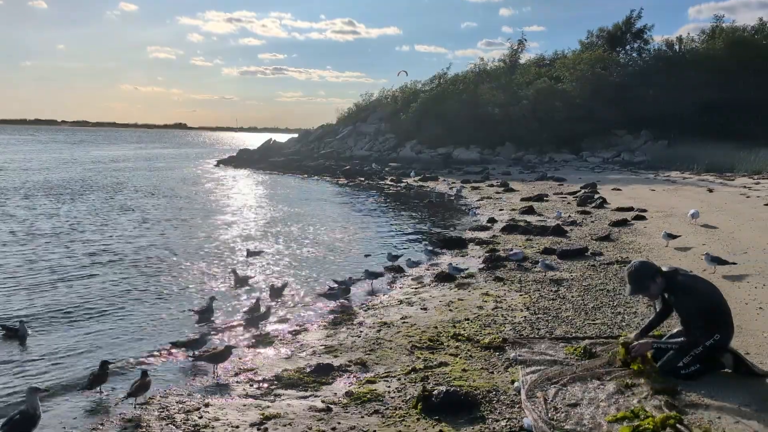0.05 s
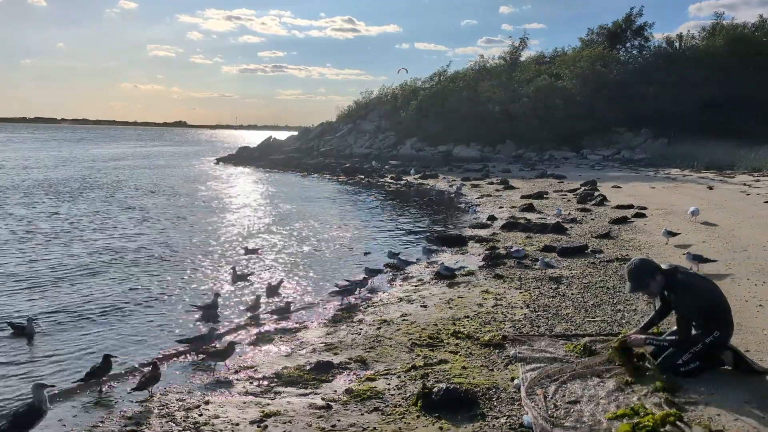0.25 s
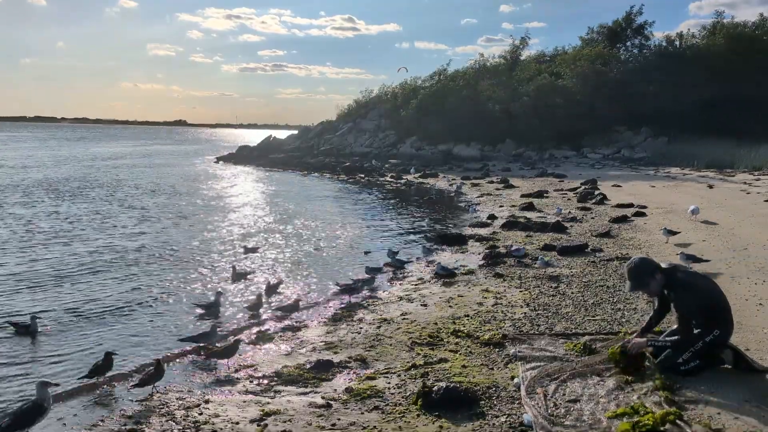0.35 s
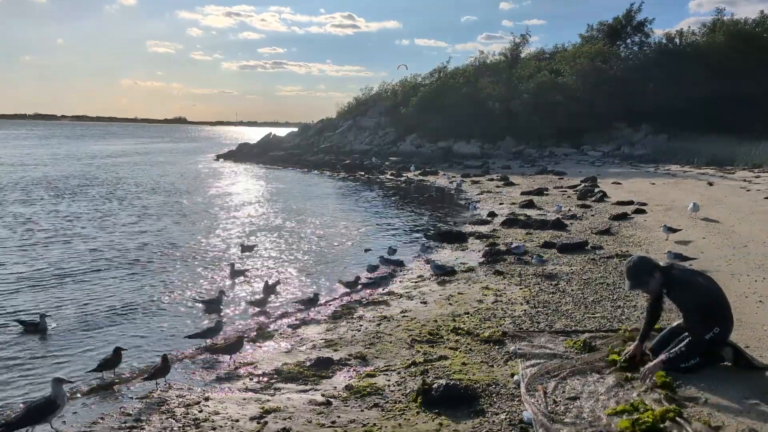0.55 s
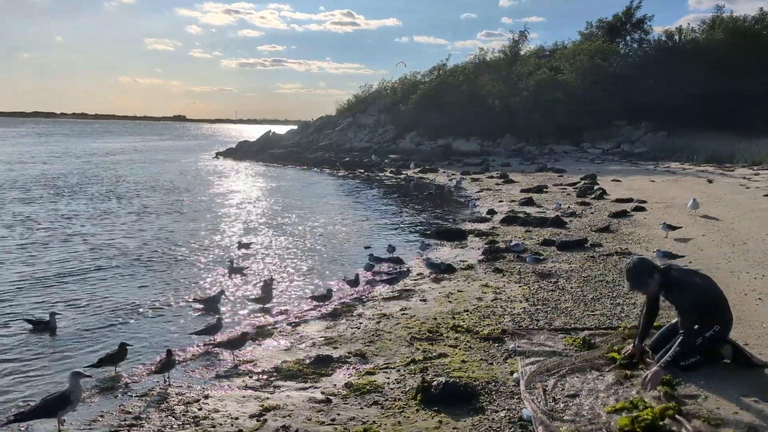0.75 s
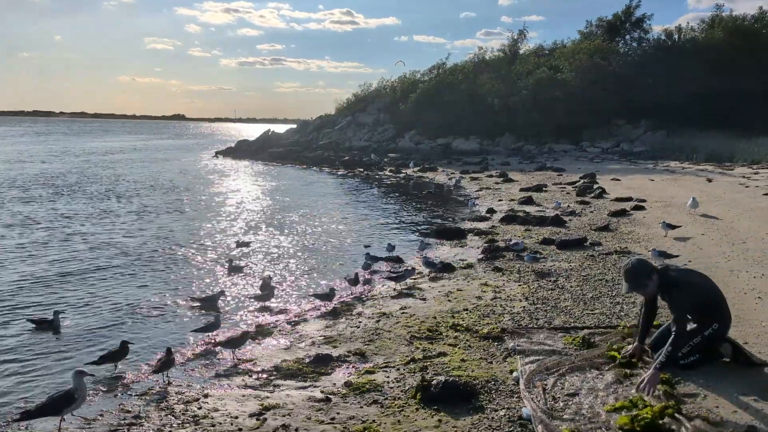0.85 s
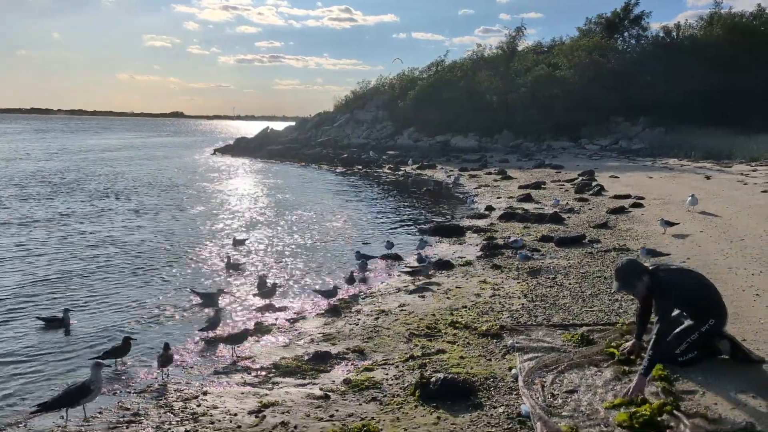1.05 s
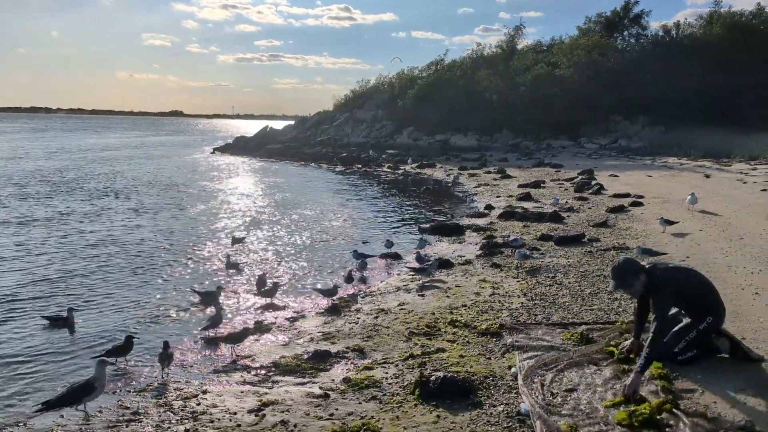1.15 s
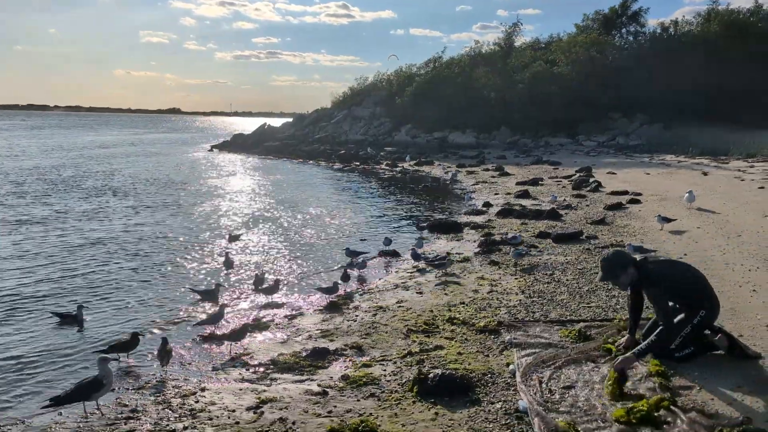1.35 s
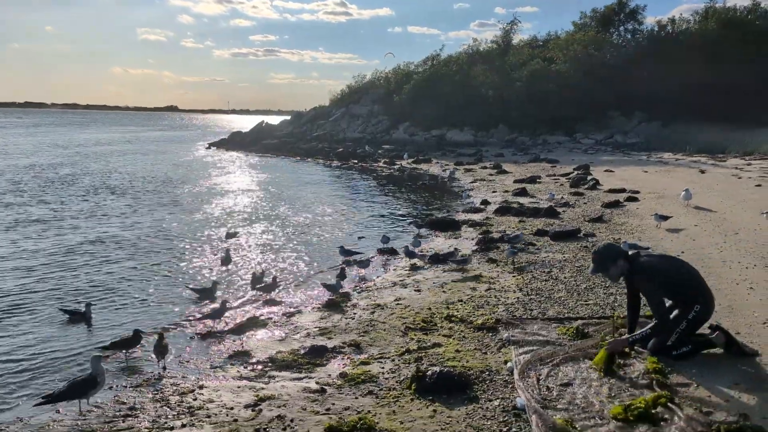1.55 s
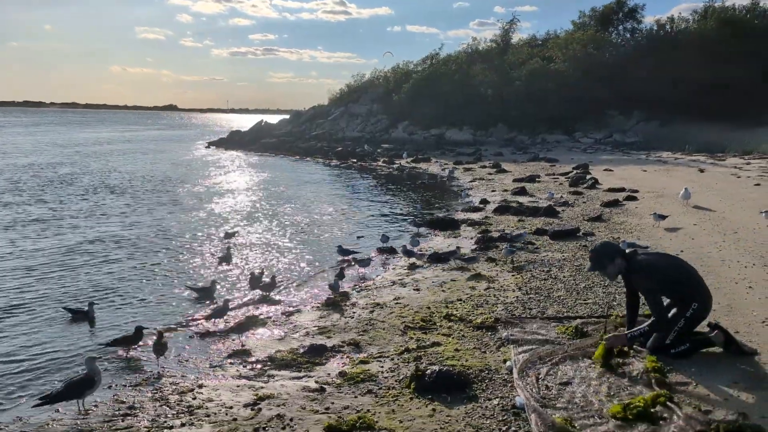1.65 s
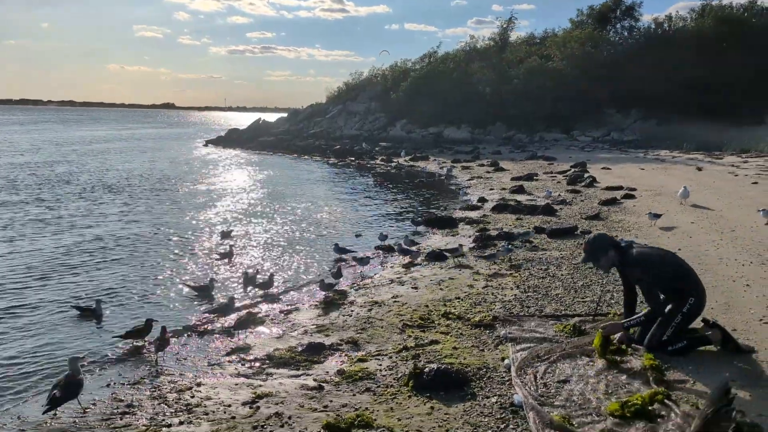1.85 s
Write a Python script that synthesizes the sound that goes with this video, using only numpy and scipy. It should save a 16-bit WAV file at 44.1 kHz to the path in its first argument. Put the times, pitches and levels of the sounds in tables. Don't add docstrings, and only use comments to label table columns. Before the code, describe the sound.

Gulls give high, clear whistling cries and quick yodels on the right over distant water wash

```python
import sys
import numpy as np
from scipy import signal
from scipy.fft import rfft, irfft
from scipy.io import wavfile
from scipy.ndimage import uniform_filter1d

SR = 44100
rng = np.random.default_rng(int(sys.argv[2]) if len(sys.argv) > 2 else 0)


def log_audio(samples):
    frames = np.atleast_2d(samples).T
    limited = np.clip(frames, -1, 1)
    pcm = np.round(limited * 32767).astype(np.int16)
    wavfile.write(sys.argv[1], SR, pcm)


def convert_level_to_amplitude(level_db):
    exponent = np.asarray(level_db, float) / 20
    return 10 ** exponent


N = 83790
T = np.arange(N) / SR
HZ = np.maximum(np.arange(N // 2 + 1) * SR / N, 1)

# (f/Hz, level/dB per Hz)
WASH_LEFT = [(380, -100), (600, -78), (800, -79.5), (1080, -67), (1400, -82.5), (1800, -101.5),
             (2200, -116), (15000, -134)]
WASH_RIGHT = [(400, -99), (570, -83), (1000, -85.5), (1700, -85), (2000, -101.5), (2700, -106),
              (6000, -114), (15000, -118)]
# (t/s, level/dB)
SWELL = [(0, -51.5), (.3, -47.5), (.7, -51), (1.1, -48.5), (1.3, -45.5), (1.5, -46.5), (1.9, -49.5)]
# (t/s, level/dB)
FIZZ = [(0, -4), (.2, -3.5), (.4, -7), (1.6, -8.5), (1.78, -1.5)]
# (f/Hz, level/dB per Hz)
WIND = [(25, -110), (45, -92), (75, -68.5), (120, -71.5), (180, -75.5), (250, -90), (340, -99), (600, -125)]
# (t/s, level/dB, left minus right/dB)
GUSTS = [(0, -52.5, -1.5), (0.501, -53, -0.5), (0.572, -38.5, 6.5), (.63, -55.5, 0.5), (0.721, -45, 0),
         (.8, -52, 5), (.9, -53, -3), (1.171, -51.5, 1), (1.26, -44, -5), (1.33, -53, -1), (1.9, -56, -3.5)]
# (t/s, peak level/dB, left minus right/dB)
TICKS = [
    (0.0886, -60, -8.5),
    (0.153, -63, -13.5),
    (1.0794, -48.5, -29),
    (1.2405, -59, -26),
    (1.4029, -60.5, -18.5),
    (1.638, -60, -11),
    (1.6666, -63, -15),
]
# (f/Hz, level re right/dB)
SHADE = [(500, 1.5), (1100, 22.5), (2200, -17), (3500, -25), (4400, -44), (7000, -52.5), (9000, -58)]

# (t/s, f/Hz, level/dB)
LONG_CRY = [(.234, 4340, -52), (.247, 4356, -29.5), (.281, 4210, -51.5), (.315, 4447, -36.5),
            (.35, 4575, -41.5), (.467, 4390, -37.5), (.53, 4260, -39.5), (.659, 4038, -38.5),
            (.686, 3790, -49.5)]
LOW_OPEN = [(.43, 3500, -36.5), (.445, 3480, -30), (.466, 3295, -32), (.505, 3470, -31),
            (.552, 3520, -27.5), (.566, 3624, -46.5)]
HIGH_HOLD = [(.555, 4684, -35.5), (.59, 4727, -38.5), (.602, 4560, -34), (.645, 4656, -40),
             (.657, 4515, -39.5), (.685, 4400, -47)]
DIP_CRY = [(.845, 4030, -39.5), (.865, 4150, -33), (.899, 3940, -33), (.93, 3777, -37), (.981, 3900, -36),
           (1.013, 4085, -38.5), (1.024, 4270, -61)]
FAR_ARCH = [(.865, 4890, -59), (.93, 5160, -59.5), (.99, 5204, -62.5), (1.06, 5120, -65), (1.13, 5040, -76)]
LAST_CRY = [(1.48, 3930, -81), (1.51, 3850, -58.5), (1.6, 3990, -38.5), (1.64, 3940, -46.5),
            (1.672, 3920, -75), (1.7, 4180, -88.5)]
FADING_CRY = [(0, 4900, -64), (.012, 4070, -69), (.05, 3750, -75), (.115, 3620, -83)]
# (t/s, f/Hz, level/dB)
DIP_LEAPS = [
    [(1.02, 4680, -60.5), (1.14, 4703, -63.5), (1.19, 4520, -60.5), (1.25, 4460, -62), (1.27, 4600, -93)],
]
# (start t/s, length/s, first f/Hz, last f/Hz,
# level/dB)
LOW_FLIPS = [
    (.678, 0.038, 3329, 3410, -34.5),
    (.746, .03, 3180, 3112, -41),
    (.818, .02, 3210, 3020, -40.5),
    (1.341, 0.024, 3160, 3084, -42),
]
HIGH_FLIPS = [
    (.716, 0.031, 4560, 4190, -41.5),
    (.764, 0.026, 4260, 4520, -47),
    (.786, .034, 4370, 4166, -51.5),
]
HOARSE_FLIPS = [
    (.834, .038, 3090, 3130, -50),
    (.76, .018, 3140, 3170, -55),
]
# (count = whistle cycles per undertone cycle, 2nd and 3rd harmonic/dB, roughness/dB,
# undertones/dB, undertone span t/s)
LONG_VOICE = dict(count=2, h2_db=-18, h3_db=-38.5, rough_db=-37.5, sub_db=-10.5, span=(0.37, 0.47))
LOW_VOICE = dict(count=3, h2_db=-29.5, h3_db=-39.5, rough_db=-45.5, sub_db=-30.5)
HIGH_VOICE = dict(count=4, h2_db=-19, h3_db=-29, rough_db=-25, sub_db=-22)
FLIP_VOICE = dict(count=3, h2_db=-11.5, h3_db=-25.5, rough_db=-50.5, sub_db=-26.5)
DIP_VOICE = dict(count=2, h2_db=-26, h3_db=-52.5, rough_db=-34.5)
LEAP_VOICE = dict(count=2, h2_db=-27.5, h3_db=-22.5, rough_db=-17.5, sub_db=-5, span=(0.92, 1))
HOARSE_VOICE = dict(count=3, h2_db=-8.5, h3_db=-19, rough_db=-12, sub_db=1.5)
LAST_VOICE = dict(count=2, h2_db=-19, h3_db=-62, rough_db=-42)
FADING_VOICE = dict(count=2, h2_db=-18, h3_db=-36, rough_db=-9, sub_db=-5.5)
# (f/Hz, level/dB)
THROAT = [(1100, -29), (2200, -7), (3500, 8.5), (5500, -6.5), (6800, -9.5), (9000, -21), (15000, -31.5)]
# (start t/s, length/s, level/dB, pulse rate f/Hz, brightness/dB)
RASPS = [
    (0.211, 0.025, -39.5, 680, -12.5),
    (0.391, 0.043, -33.5, 480, -29.5),
    (0.827, 0.022, -46.5, 600, -23),
    (1.314, 0.024, -41, 750, -6.5),
]
# (f/Hz, width/Hz, level/dB)
RASP_THROAT = [(3153, 400, 4.5), (3917, 890, 7), (5620, 930, -8), (2210, 380, -14.5)]
RASP_BEAK = [(7790, 1850, 4.5), (10200, 980, -26.5), (13000, 8900, -12)]


def shape(table, hz):
    f, db = np.array(table, float).T
    return np.interp(np.log(hz), np.log(f), db)


def envelope(table, column=1):
    points = np.array(table).T
    return np.interp(T, points[0], points[column])


def colour(x, db):
    return irfft(rfft(x) * convert_level_to_amplitude(db), N)


def walk(rate, n=N):
    hold = int(SR / rate)
    steps = np.repeat(rng.standard_normal(n // hold + 1), hold)
    return 1.7 * uniform_filter1d(uniform_filter1d(steps, hold), hold)[:n]


def decay(n, t60_s):
    return np.exp(-np.log(1000) * np.arange(n) / SR / t60_s)


def noise_pair(left, right, likeness, flicker_db, rate, bands, fizz_db=0):
    shared, *own = rng.standard_normal((3, N))
    noise = np.sqrt(likeness) * shared + np.sqrt(1 - likeness) * np.array(own)
    spectrum = rfft(noise) * convert_level_to_amplitude([shape(left, HZ), shape(right, HZ)]) * np.sqrt(SR / 2)
    half_octave = 2 * np.log2(HZ / 20)
    out = np.zeros((2, N))
    for k in bands:
        band = irfft(spectrum * np.clip(1 - abs(half_octave - k), 0, 1), N)
        lift_db = fizz_db if k > 14 else 0
        out += band * convert_level_to_amplitude(flicker_db * walk(rate) + lift_db)
    return out


def distant_wash():
    wash = noise_pair(WASH_LEFT, WASH_RIGHT, likeness=0.11, flicker_db=2.0, rate=12.29,
                      bands=range(7, 20), fizz_db=envelope(FIZZ))
    return wash * convert_level_to_amplitude(envelope(SWELL) + 50)


def wind():
    rumble = noise_pair(WIND, WIND, likeness=0.3, flicker_db=1.8, rate=10.76, bands=range(11))
    gust_db = envelope(GUSTS) + 53.5
    pan_db = envelope(GUSTS, 2) / 2
    return rumble * convert_level_to_amplitude([gust_db + pan_db, gust_db - pan_db])


def ticks():
    out = np.zeros((2, N))
    n = 600
    for start, db, pan_db in TICKS:
        i = int(start * SR)
        click = rng.standard_normal(n) * decay(n, t60_s=0.012)
        out[:, i:i + n] += convert_level_to_amplitude(db - 0.5) * click * convert_level_to_amplitude([[pan_db], [0]])
    return signal.sosfilt(signal.butter(2, 3500, "high", fs=SR, output="sos"), out)


def resonate(pulses, table):
    out = np.zeros(N)
    for k, (hz, width, db) in enumerate(table):
        rung = pulses
        for bandwidth in (width, 2 * width):
            rung = signal.lfilter(*signal.iirpeak(hz, hz / bandwidth, fs=SR), rung)
        out += (-1) ** k * convert_level_to_amplitude(db) * rung
    return out


def rasp(start, length, db, rate, bright_db):
    jitter, scatter = rng.standard_normal((80, 2)).T
    gaps = np.exp(0.09 * jitter - 0.008 * np.arange(80)) / rate
    at = start + np.cumsum(gaps)
    rise = np.clip((at - start) / (0.73 * length), 0, 1) ** 1.2
    fall = np.exp(-np.clip(at - start - length, 0, 1) / 0.0041)
    pulses = np.zeros(N)
    pulses[(at * SR).astype(int)] = rise * fall * convert_level_to_amplitude(2.5 * scatter)
    throat = resonate(pulses, RASP_THROAT)
    beak = resonate(pulses, RASP_BEAK)
    throat_rms = np.sqrt(np.sum(throat ** 2) / (length * SR))
    return convert_level_to_amplitude(db) * (throat + convert_level_to_amplitude(bright_db) * beak) / throat_rms


def whistle(table, count, h2_db, h3_db, rough_db, sub_db=-60, span=(0, 2)):
    t, pitch, level = np.array(table, float).T
    a, b = int(t[0] * SR), int(t[-1] * SR)
    n, now = b - a, T[a:b]
    hz, db = (uniform_filter1d(np.interp(now, t, y), size=min(n // 8, 500), mode="nearest")
              for y in (pitch, level))
    phase = 2 * np.pi * np.cumsum(hz * (1 + 0.0029 * walk(150, n))) / SR
    tone = np.sin(phase)
    tone += convert_level_to_amplitude(h2_db + 3.9 * walk(30, n)) * np.sin(2 * phase)
    tone += convert_level_to_amplitude(h3_db + 1.7 * walk(40, n)) * np.sin(3 * phase)
    gate = np.clip(np.minimum(now - span[0], span[1] - now) / 0.047 + 1, 0, 1)
    for k in range(1, 4 * count):
        if k % count and k * hz.max() / count < 0.45 * SR:
            waver = convert_level_to_amplitude(3 * walk(45, n)) * (1 + 0.35 * walk(700, n))
            throat = convert_level_to_amplitude(sub_db + shape(THROAT, k * hz / count))
            tone += gate * waver * throat * np.sin(k * phase / count + k * k)
    edge = np.clip(np.minimum(now - T[a], T[b] - now) / 0.0037, 0, 1)
    breath = 1 + convert_level_to_amplitude(rough_db) * walk(1400, n)
    out = np.zeros(N)
    out[a:b] = np.sqrt(2) * convert_level_to_amplitude(db) * edge * tone * breath
    return out


def note(start, length, first_hz, last_hz, db):
    return [(start + s * length, first_hz + s * (last_hz - first_hz), db - 5 * fade)
            for s, fade in ((0, 1), (0.3, 0.27), (1, 0.83))]


def gulls():
    cries = [(LONG_CRY, LONG_VOICE), (LOW_OPEN, LOW_VOICE), (HIGH_HOLD, HIGH_VOICE), (DIP_CRY, DIP_VOICE),
             (DIP_LEAPS[0], LEAP_VOICE), (FAR_ARCH, DIP_VOICE), (LAST_CRY, LAST_VOICE),
             (FADING_CRY, FADING_VOICE)]
    flips = [(LOW_FLIPS, FLIP_VOICE), (HIGH_FLIPS, HIGH_VOICE), (HOARSE_FLIPS, HOARSE_VOICE)]
    for table, voice in flips:
        cries += [(note(*row), voice) for row in table]
    whistles = sum(whistle(cry, **voice) for cry, voice in cries)
    return 2 * (whistles + sum(rasp(*row) for row in RASPS))


def ground_echo(birds):
    tail = rng.standard_normal(8000) * decay(8000, t60_s=0.13)
    tail /= np.sqrt(np.sum(tail ** 2))
    return convert_level_to_amplitude(-20.5) * signal.fftconvolve(birds, tail)[:N]


def scene():
    background = distant_wash() + wind() + ticks()
    birds = gulls()
    birds = birds + ground_echo(birds)
    return background + np.array([colour(birds, shape(SHADE, HZ)), birds])


def roll_off(x):
    return signal.sosfilt(signal.butter(12, 15720, fs=SR, output="sos"), x)


def record(dry):
    return roll_off(dry)


dry = scene()
out = record(dry)
log_audio(out)
```